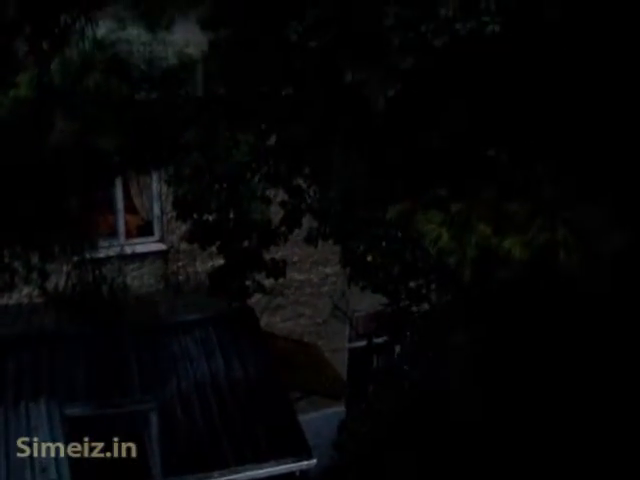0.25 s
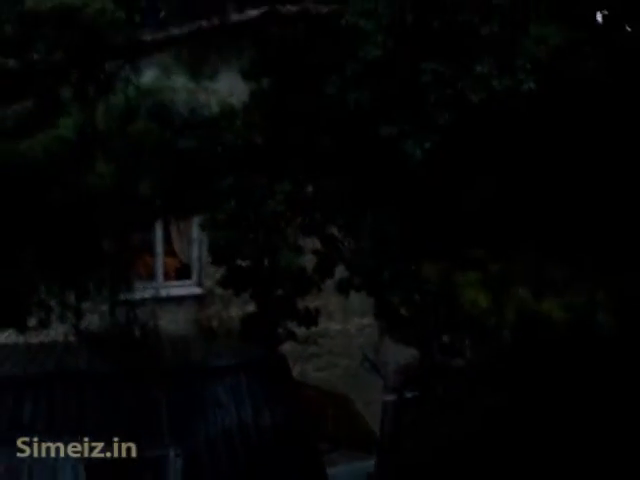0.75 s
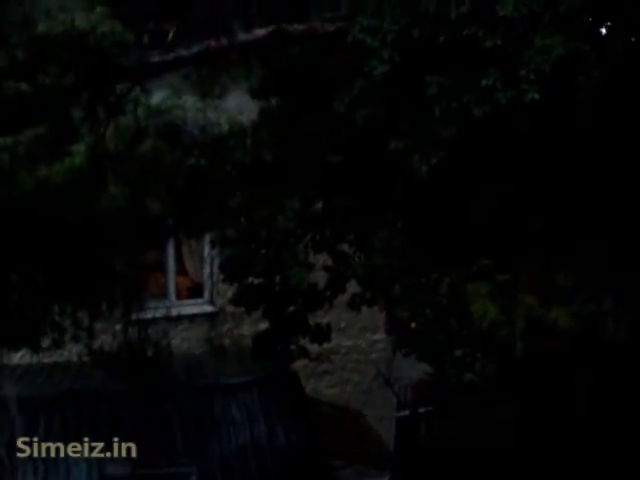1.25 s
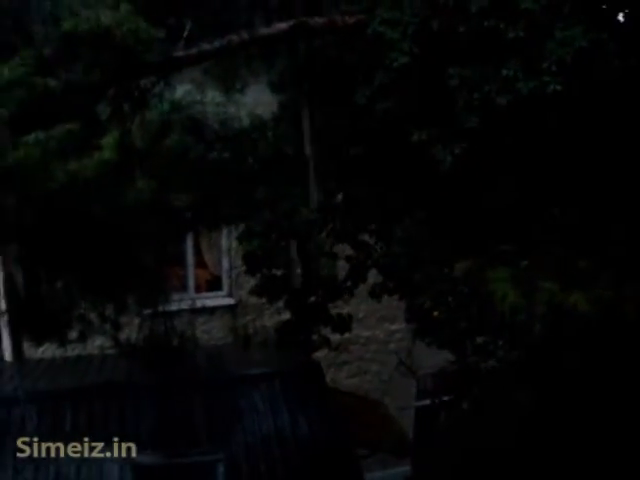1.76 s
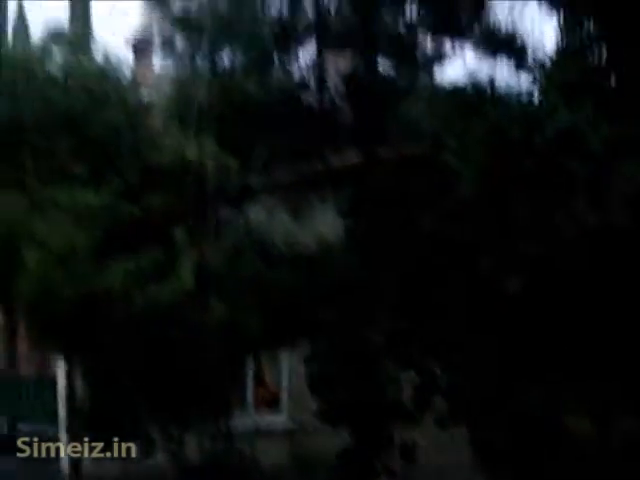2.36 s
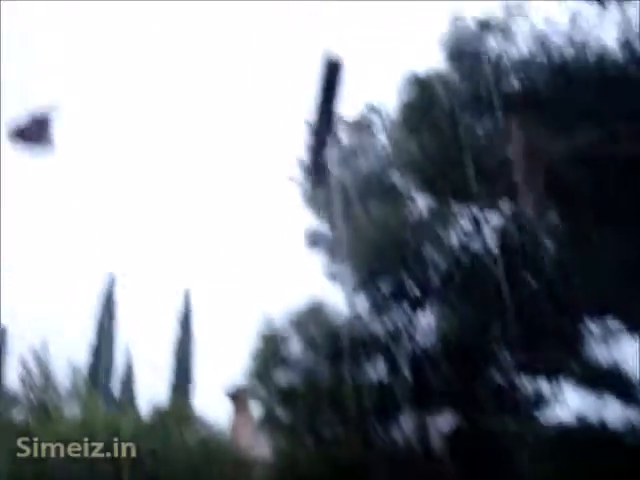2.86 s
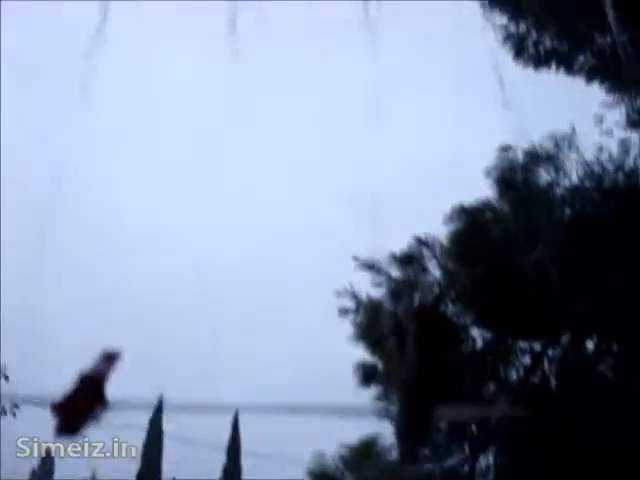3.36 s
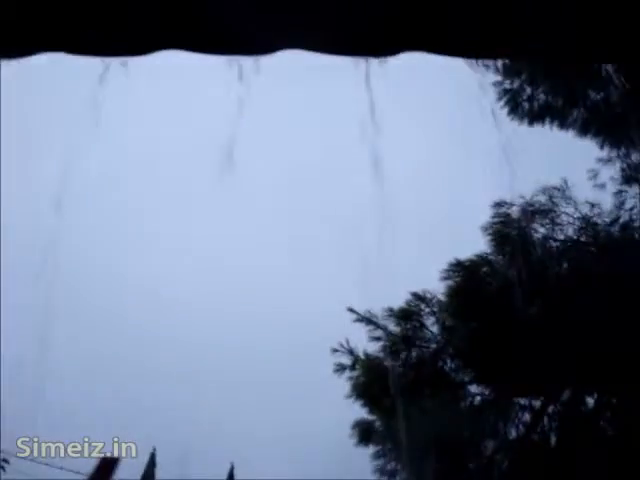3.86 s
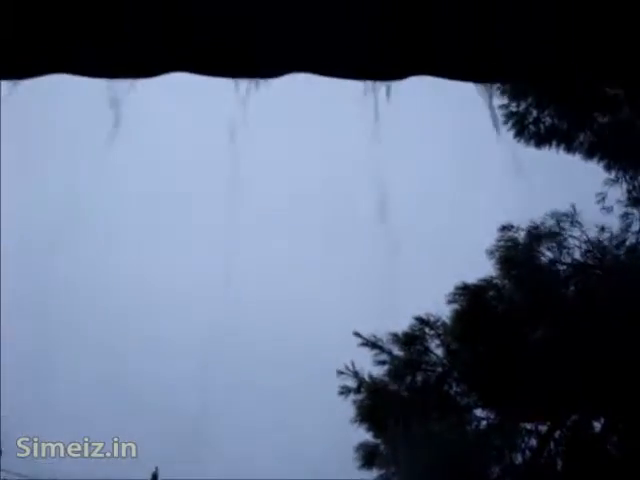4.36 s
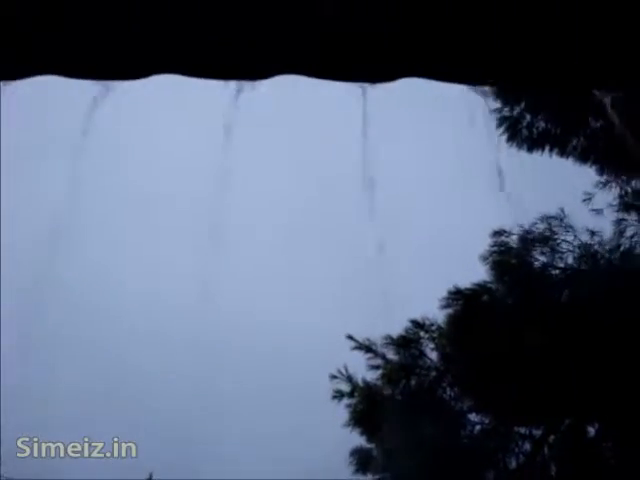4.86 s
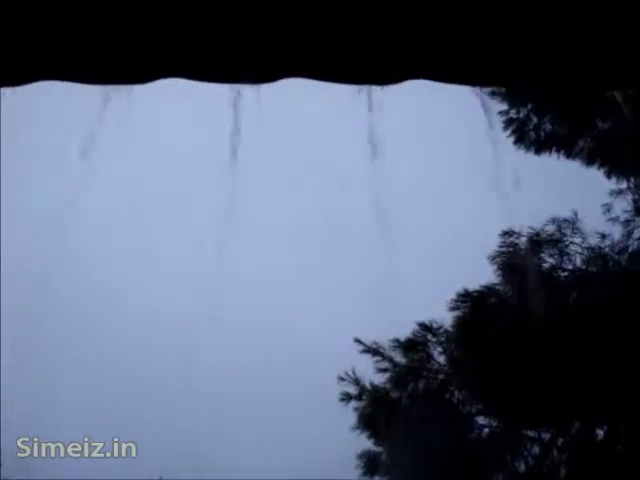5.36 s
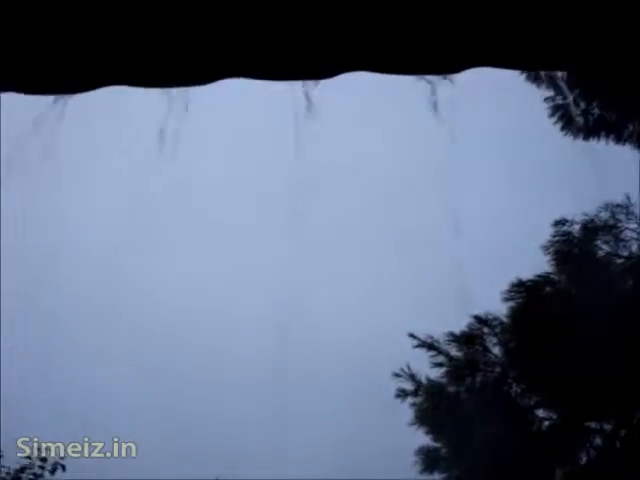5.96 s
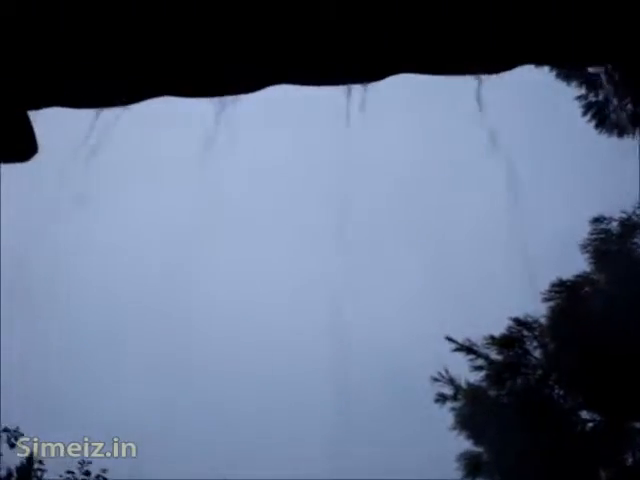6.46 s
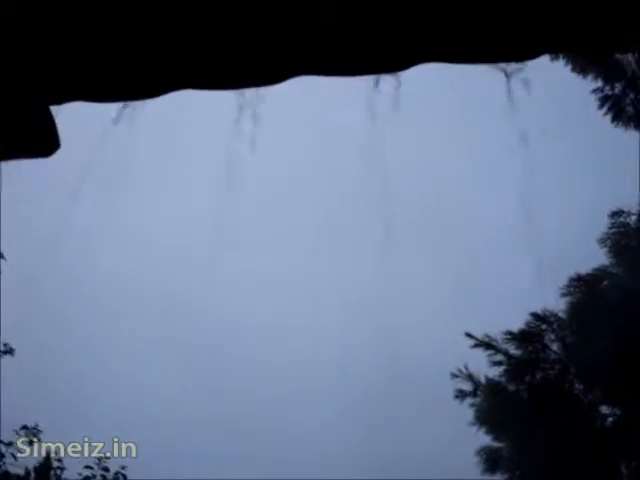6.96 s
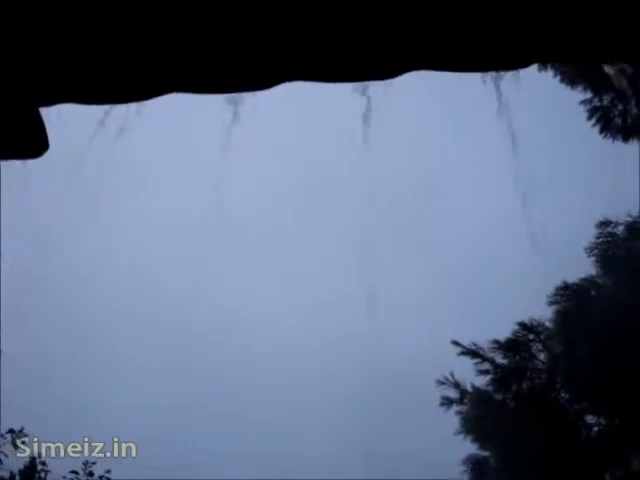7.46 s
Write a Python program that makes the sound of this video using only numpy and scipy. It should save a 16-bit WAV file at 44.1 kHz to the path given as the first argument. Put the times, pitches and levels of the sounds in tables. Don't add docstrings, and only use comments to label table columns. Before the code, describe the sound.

Outdoors under a metal roof, steady torrential rain fills everything from start to end, with a hollow midrange drumming and a fine splashing hiss from water pouring off the edge. Soft low gusts flutter against the microphone early, fading after about four seconds. One isolated drop ticks midway and a brighter one near the end. Essentially mono, close, with brief compression warbles in the treble.

```python
import sys
import numpy as np
from scipy import signal
from scipy.fft import dct
from scipy.io import wavfile
from scipy.ndimage import uniform_filter1d

SR = 44100
rng = np.random.default_rng(int(sys.argv[2]) if len(sys.argv) > 2 else 0)


def int16_out(signal):
    q = np.round(np.clip(np.atleast_2d(signal).T, -1, 1) * 32767)
    wavfile.write(sys.argv[1], SR, q.astype(np.int16))


def natural_amplitude(level_db):
    exponent = np.asarray(level_db, float) / 20
    return 10 ** exponent


N = 340452

# time_s, level_db
DOWNPOUR = [(0, -16), (.54, -16.8), (.95, -15.5), (4.1, -15.5), (4.4, -16), (6.1, -15.5), (6.5, -16),
            (7.0, -16.5), (7.72, -16)]
# freq_hz, density_db
ROAR_SPECTRUM = [(88, -47.5), (150, -22.5), (342, -3.5), (436, -6), (532, -0.5), (1130, -1), (2270, -4.5),
                 (4500, -16.5), (5850, -47), (9900, -120)]
# freq_hz, width_hz, level_db
PANEL_MODES = [(337, 39, -18), (490, 40, -2), (692, 27, 10.5), (1014, 79, 7), (1139, 46, 18),
               (1280, 90, -0.5), (1630, 37, 0.5), (2100, 52, -8)]
# freq_hz, density_db
SPRAY_SPECTRUM = [(1800, -22), (3000, -1), (4000, -2.5), (5300, -2.5), (7000, -6), (9400, -10.5),
                  (10300, -17)]
# centre_s, peak_db, pitch_hz
DRIPS = [
    (3.512, -24, 7000),
    (6.529, -23, 6000),
    (6.8795, -30, 8800),
    (6.8925, -15, 8800),
]
# freq_hz, density_db
WIND_SPECTRUM = [(20, -28.5), (45, -22), (65, -4.5), (110, -11.5), (150, -1), (210, -2), (320, -21.5)]
# time_s, level_db
WIND_LEVEL = [(0, -48), (2.6, -49.5), (3.1, -49), (7.4, -53), (7.72, -56)]
# centre_s, peak_db, half_length_s
GUSTS = [(0, -40, .04), (.13, -43, 0.046), (.41, -37, .07), (.58, -39, 0.044), (1.18, -41, .04),
         (1.3, -34, .08), (1.46, -33, 0.043), (1.89, -44, .1), (2.47, -40, .03), (2.56, -38, .04),
         (2.69, -33, .06), (3.48, -45, .06), (3.88, -43, 0.027)]
# centre_s, length_s, lowest_touched_hz, highest_survivor_hz, rest_db
THINNED_FRAMES = [(.113, .032, 8300, 10000, -14), (1.341, .029, 3300, 4500, -20),
                  (1.772, .03, 5200, 10500, -12), (1.94, .029, 2000, 5300, -20),
                  (2.492, .027, 2800, 4200, -22), (2.668, .052, 3900, 9000, -32),
                  (3.283, .028, 2800, 5000, -22), (3.771, .03, 2700, 5800, -21),
                  (4.478, .029, 2500, 4300, -21), (4.746, .036, 3800, 10000, -20),
                  (5.003, .034, 3000, 10000, -20), (5.196, .036, 5000, 8800, -15),
                  (5.6, .034, 4500, 10000, -20), (6.048, .032, 4500, 10000, -18),
                  (6.561, .038, 4500, 9000, -22), (6.624, .034, 3200, 8800, -17),
                  (6.86, .036, 5000, 9500, -18), (6.876, .04, 8000, 8000, -20),
                  (6.951, .036, 3200, 7600, -20), (7.008, .034, 4800, 10000, -20),
                  (7.088, .046, 3500, 9600, -20), (7.556, .046, 2100, 3900, -45),
                  (7.58, .04, 2300, 7000, -20)]
# centre_s, low_hz
SPLIT_BANDS = [(.18, 4670), (.385, 5170), (.385, 6250), (.688, 8200), (1.617, 4400), (1.804, 4670),
               (1.92, 8200), (2.408, 6300), (2.544, 8200), (2.921, 6900), (3.432, 4670), (3.478, 6300),
               (3.823, 4240), (3.868, 4450), (4.106, 5680), (4.263, 5680), (5.64, 4670), (7.494, 5680),
               (7.678, 4240)]

EDGE_HZ = 10130


def evened(x):
    return x / np.sqrt(np.mean(x ** 2) + 1e-20)


def curve(rows):
    return np.interp(np.arange(N) / SR, *np.transpose(rows))


def read_spectrum(points, hz):
    f, db = np.transpose(points)
    return np.interp(np.log(hz + 1), np.log(f + 1), db)


def add(mix, centre_s, sound):
    start = round(centre_s * SR) - len(sound) // 2
    part = mix[start:start + len(sound)]
    part += sound[:len(part)]


def drops(per_s, spread_db):
    size = natural_amplitude(spread_db * np.minimum(rng.exponential(1, N), 5))
    sign = rng.choice([-1., 1.], N)
    lands = rng.random(N) < per_s / SR
    return evened(size * sign * lands)


def coloured(x, spectrum, patchy_db):
    hz, _, z = signal.stft(x, SR, nperseg=1024, noverlap=768)
    patches = rng.standard_normal(z.shape)
    patches = uniform_filter1d(patches, size=12, axis=0)
    patches = evened(uniform_filter1d(patches, size=12, axis=1))
    z = z * natural_amplitude(read_spectrum(spectrum, hz)[:, None] + patchy_db * patches)
    return evened(signal.istft(z, SR, nperseg=1024, noverlap=768)[1][:N])


def roof():
    t = np.arange(2048) / SR
    ring = np.zeros(len(t))
    for hz, width_hz, db in PANEL_MODES:
        decay = np.exp(-np.pi * width_hz * t)
        ring += natural_amplitude(db) * np.sqrt(width_hz) * decay * np.sin(2 * np.pi * hz * t)
    panels = signal.oaconvolve(drops(2500, spread_db=-0.5), ring)[:N]
    no_bass = signal.butter(N=4, Wn=280, btype="high", fs=SR, output="sos")
    panels = evened(signal.sosfilt(no_bass, panels))
    blur = .35 * drops(3000, spread_db=3.5) + rng.standard_normal(N)
    return evened(coloured(blur, ROAR_SPECTRUM, patchy_db=0.55) + natural_amplitude(-14) * panels)


def runoff():
    spray = .45 * drops(1500, spread_db=-0.5) + rng.standard_normal(N)
    return coloured(spray, SPRAY_SPECTRUM, patchy_db=1.0)


def drips():
    out = np.zeros(N)
    t = np.arange(-300, 300) / SR
    for centre_s, db, hz in DRIPS:
        tick = np.exp(-(t / .00038) ** 2) * np.cos(2 * np.pi * hz * t)
        add(out, centre_s, natural_amplitude(db) * tick)
    return out


def wind():
    flutter_db, flutter_s = 3.0, 0.046
    rumble = coloured(rng.standard_normal(N), WIND_SPECTRUM, patchy_db=0)
    t = np.arange(N) / SR
    knots = np.arange(0, 8, flutter_s)
    flutter = np.interp(t, knots, rng.standard_normal(len(knots)))
    level = natural_amplitude(curve(WIND_LEVEL) + flutter_db * flutter)
    for centre_s, db, half_s in GUSTS:
        level = level + natural_amplitude(db) * np.exp(-((t - centre_s) / half_s) ** 2)
    return level * rumble


def scene():
    spray_db, spray_follows = -25, .5
    storm_db = curve(DOWNPOUR)
    spray_level_db = spray_db + spray_follows * (storm_db - storm_db.mean())
    mix = natural_amplitude(storm_db) * roof() + natural_amplitude(spray_level_db) * runoff() + wind()
    return np.tile(mix, (2, 1))


def ducked(x):
    duck_s, duck_db, attack_s, recovery_s = 6.59, -1, .005, 0.11
    since_s = np.arange(N) / SR - duck_s
    fall = np.clip(since_s / attack_s, 0, 1)
    recovery = np.exp(-np.maximum(since_s, 0) / recovery_s)
    return x * natural_amplitude(duck_db * fall * recovery)


def band_limited(x):
    low_cut = signal.butter(N=2, Wn=45, btype="high", fs=SR)
    high_cut = signal.firwin(2047, EDGE_HZ, window=("kaiser", 9), fs=SR)
    return signal.oaconvolve(signal.lfilter(*low_cut, x), high_cut, "same")


def pitted(x):
    below_db, chance, hole_db, from_hz = -3.6, .5, -18, 4800
    bins, hops = 5, 3
    hz, _, z = signal.stft(x, SR, nperseg=384, noverlap=288)
    power = np.add.reduceat(abs(z) ** 2, np.arange(0, z.shape[0], bins), 0)
    power = np.add.reduceat(power, np.arange(0, z.shape[1], hops), 1)
    weak = power < natural_amplitude(below_db) ** 2 * power.mean(1, keepdims=True)
    sinks = weak & (rng.random(power.shape) < chance)
    band, block = np.arange(z.shape[0]) // bins, np.arange(z.shape[1]) // hops
    sinks = sinks[band][:, block] & (hz > from_hz)[:, None]
    z = z * np.where(sinks, natural_amplitude(hole_db), 1)
    return signal.istft(z, SR, nperseg=384, noverlap=288)[1][:N]


def frame(x, centre_s, length, fade, bend=0.9):
    n = np.arange(length)
    edge = np.clip(np.minimum(n, n[::-1]) / fade, 0, 1)
    taper = np.sin(np.pi / 2 * edge ** bend)
    start = round(centre_s * SR) - length // 2
    block = np.pad(x, (0, length))[start:start + length]
    return dct(block * taper, norm="ortho"), n * SR / (2 * length), taper


def thinned(x):
    kept_share, kept_at_s, low_favour = .06, .032, .2
    out = x.copy()
    for centre_s, length_s, low_hz, top_hz, rest_db in THINNED_FRAMES:
        lines, hz, taper = frame(out, centre_s, round(length_s * SR), fade=720)
        around = uniform_filter1d(abs(lines), size=80)
        strength = abs(lines) / (abs(around) + 1e-9) / np.maximum(hz, low_hz) ** low_favour
        rivals = strength[(hz > low_hz) & (hz < EDGE_HZ)]
        bar = np.quantile(rivals, 1 - kept_share * kept_at_s / length_s)
        survives = (strength > bar) & (hz < top_hz)
        touched = (hz > low_hz) | (hz < 130)
        change = np.where(survives, .55, natural_amplitude(rest_db) - 1) * touched
        add(out, centre_s, taper * dct(lines * change, type=3, norm="ortho"))
    return out


def split(x):
    span = 1.21
    side = np.zeros(N)
    for centre_s, low_hz in SPLIT_BANDS:
        lines, hz, taper = frame(x, centre_s, 2048, fade=900, bend=1.5)
        band = (hz > low_hz) & (hz < span * low_hz)
        strength = np.sqrt(abs(uniform_filter1d(lines ** 2, size=50)))
        noise = rng.standard_normal(2048) * strength
        add(side, centre_s, 1.1 * taper * dct(noise * band, type=3, norm="ortho"))
    return side


def top_cut(x):
    return signal.sosfilt(signal.butter(12, 10950, fs=SR, output="sos"), x)


def record(dry):
    mono = band_limited(ducked(dry[0]))
    mono = thinned(pitted(mono)) + drips()
    side = split(mono)
    return top_cut(np.array([mono + side, mono - side]))


dry = scene()
out = record(dry)
int16_out(out)
```